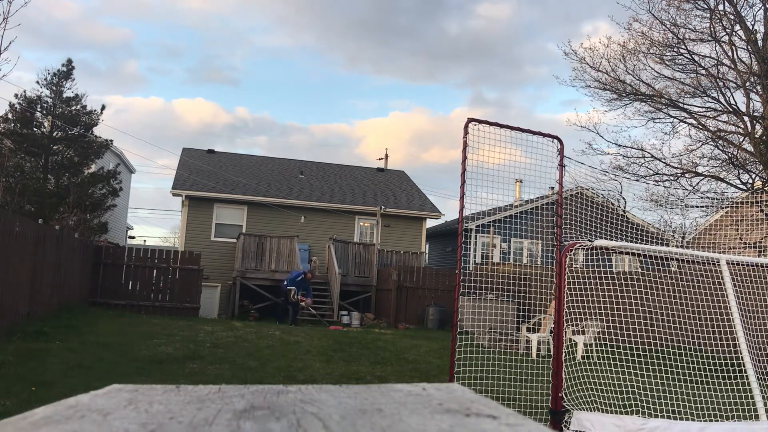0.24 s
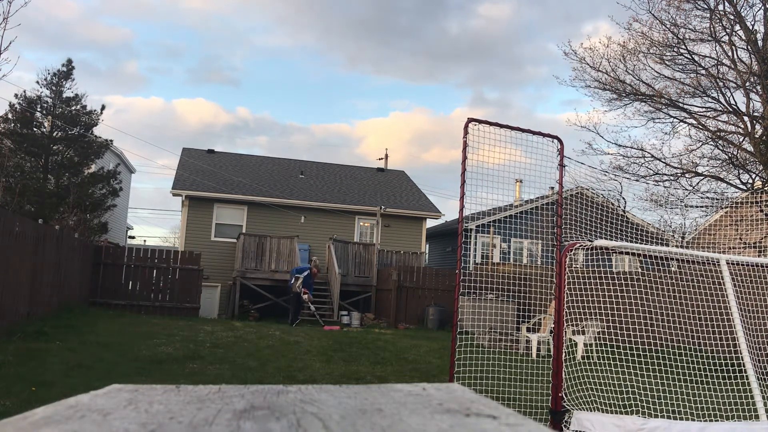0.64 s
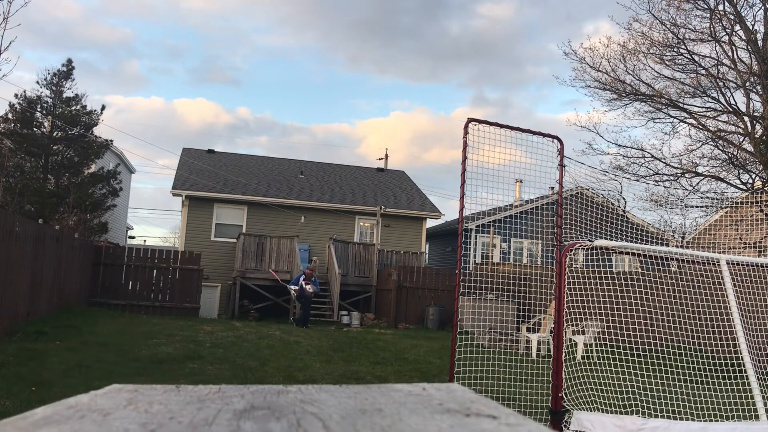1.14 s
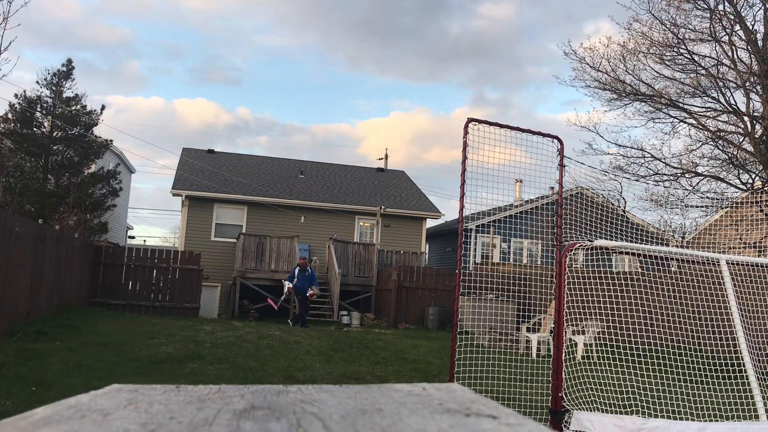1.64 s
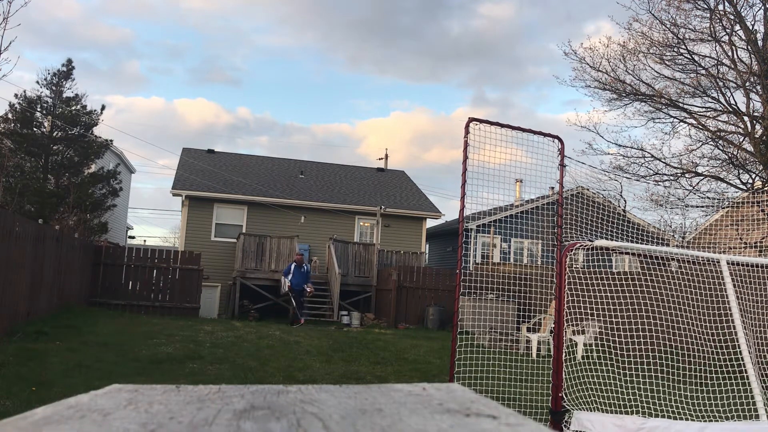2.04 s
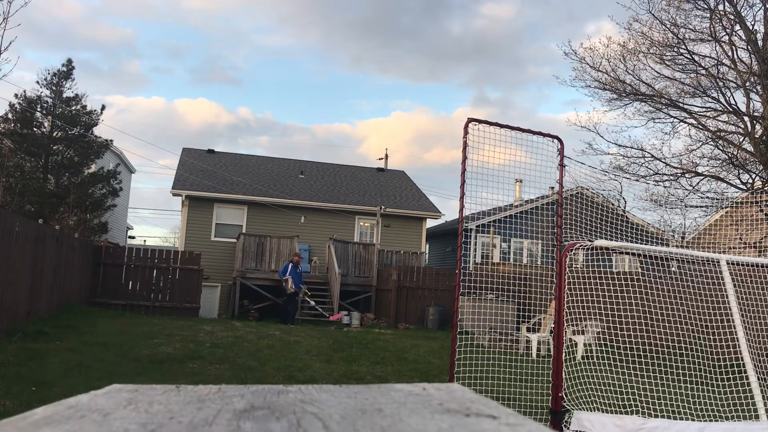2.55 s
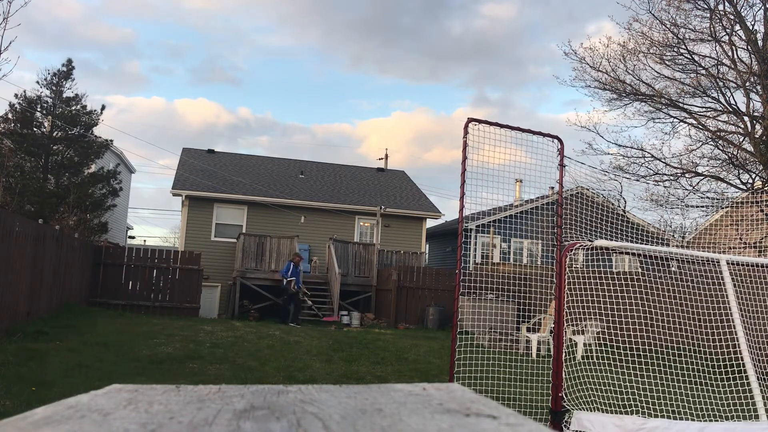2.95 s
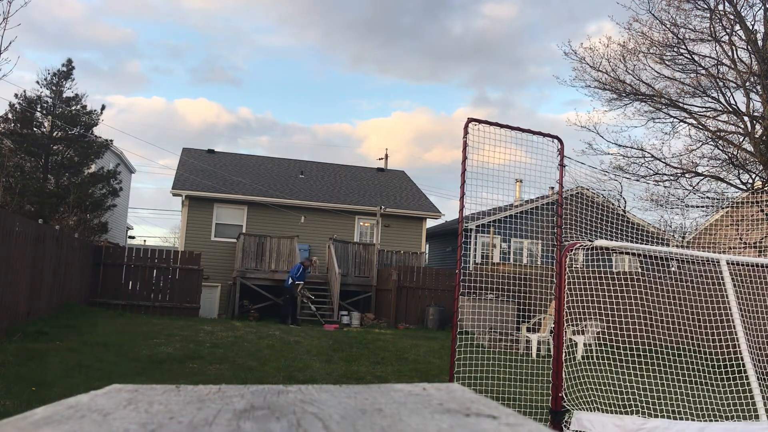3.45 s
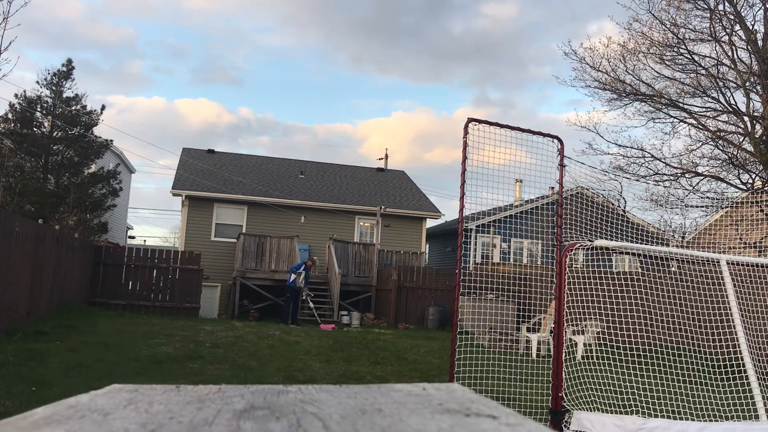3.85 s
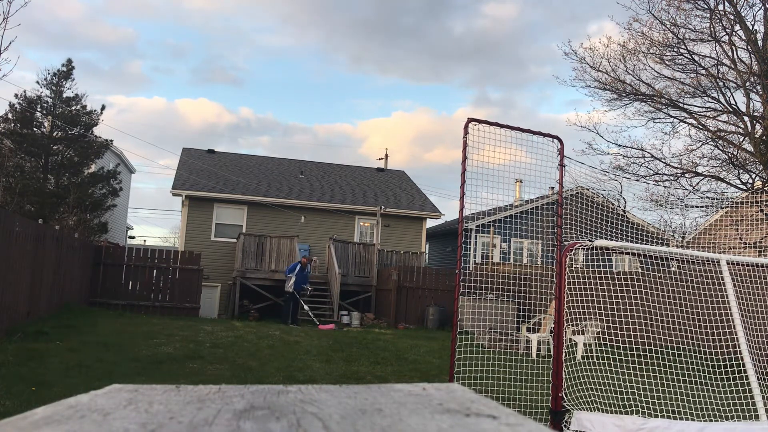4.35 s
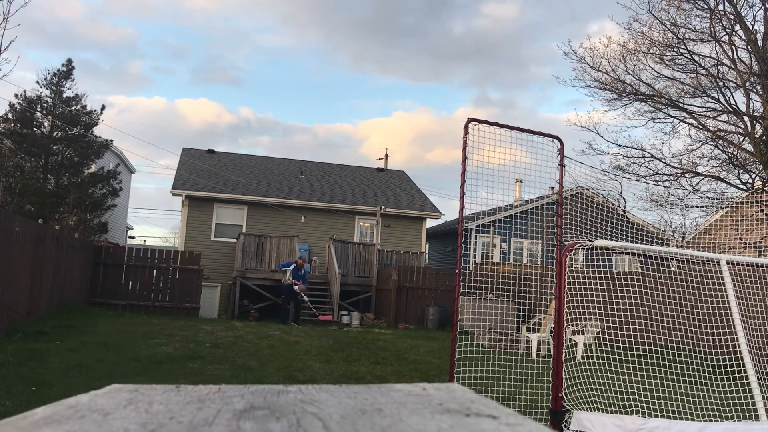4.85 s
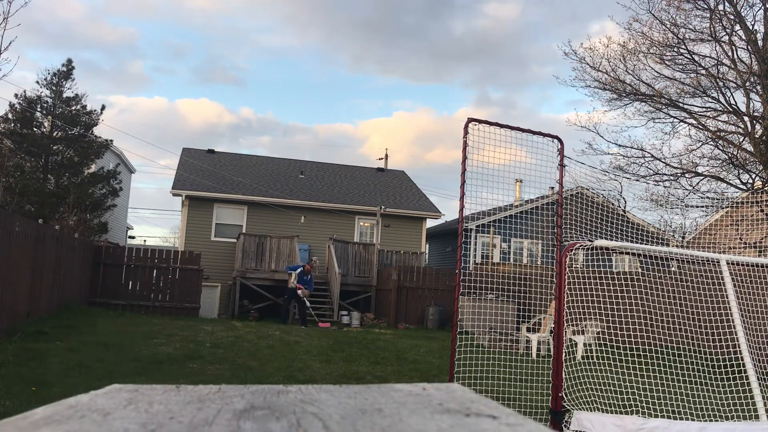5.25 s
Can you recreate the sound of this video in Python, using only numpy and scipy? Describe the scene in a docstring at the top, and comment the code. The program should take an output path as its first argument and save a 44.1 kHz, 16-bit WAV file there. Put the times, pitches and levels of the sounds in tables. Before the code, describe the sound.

Outdoor puck handling: far-off stick clacks, one sharp crashing hit in the close net and metal frame, then more scattered taps over low hum.

```python
"""A distant engine hums throughout while a player handles a puck on a board at the far end of a fenced backyard.
The player sweeps the puck along and shoots: filtered noise scrapes, and bounces excite board and blade resonances.
In the goal close by, netting whips, the target thuds and rattles (resonances), and the steel frame rings (sines).
The player then pulls up the next puck and handles it; a last hard landing comes near the end.
Echoes and a scattered tail follow the sounds of player and goal, and faint ticks come now and then."""
import sys
import numpy as np
from scipy import signal
from scipy.fft import rfft, irfft, next_fast_len
from scipy.io import wavfile
from scipy.ndimage import map_coordinates

SR = 44100
rng = np.random.default_rng(int(sys.argv[2]) if len(sys.argv) > 2 else 0)


def pcm_store(signal):
    """Save signal as 16-bit PCM."""
    levels = np.round(np.clip(np.atleast_2d(signal), -1, 1) * 32767)
    wavfile.write(sys.argv[1], SR, levels.astype(np.int16).T)


N = 242991
TIME = np.arange(N) / SR  # s
BLOW_SIZE = 8192  # samples in one short blow


def from_db(db):
    """Turn decibels into a gain."""
    return 10 ** (np.asarray(db) / 20)


def rms_one(x):
    """Scale a sound to rms 1."""
    return x / np.sqrt(np.mean(x ** 2) + 1e-30)


def at_hz(points, hz):
    """Read a table between its points, on a log-frequency axis."""
    points = np.array(points)
    return np.interp(np.log(np.maximum(hz, 1)), np.log(points[:, 0]), points[:, 1])


def cut(x, hz, kind, order=2):
    """Keep only part of the spectrum, with a Butterworth filter."""
    edge = np.minimum(hz, SR / 2 - 100)
    return signal.sosfilt(signal.butter(order, edge, kind, fs=SR, output="sos"), x)


def coloured(x, spectrum):
    """Weight each frequency of x by a smooth curve."""
    gain = from_db(at_hz(spectrum, np.fft.rfftfreq(len(x), 1 / SR)))
    return irfft(rfft(x) * gain, len(x))


def noise(spectrum):
    """Make steady noise of one colour, with rms 1."""
    white = rng.standard_normal(next_fast_len(N))
    return rms_one(coloured(white, spectrum)[:N])


def drift(rate):
    """Wander smoothly by about 1 either way, through rate random points a second."""
    knots = rng.standard_normal(1024)
    return map_coordinates(knots, [TIME * rate], mode="mirror")


def resonate(x, modes):
    """Let x drive side-by-side resonances, added with alternating signs."""
    out = 0
    for k, (hz, width, db) in enumerate(modes):
        r = np.exp(-np.pi * width / SR)  # a wider resonance dies faster
        poles = [1, -2 * r * np.cos(2 * np.pi * hz / SR), r * r]
        gain = (-1) ** k * from_db(db) * (1 - r * r) / 2
        out = out + gain * signal.lfilter([1, 0, -1], poles, x + 1e-18)
    return out


def add(track, s, sound, db):
    """Lay a short sound into the track, with the energy that db rms has in 10 ms."""
    start = int(s * SR)
    energy = np.sum(sound ** 2) / (SR / 100)
    track[start:start + len(sound)] += (from_db(db) * sound / np.sqrt(energy))[:N - start]


def clatter(decay, first_share, grain_db):
    """Force of one contact: a first sharp touch, then uneven micro-slaps that die away."""
    slaps = rng.standard_normal(BLOW_SIZE) * from_db(grain_db * rng.standard_normal(BLOW_SIZE))
    force = slaps * np.exp(-np.minimum(TIME[:BLOW_SIZE] / decay, 20))
    force[0] = first_share * np.sqrt(np.sum(force ** 2))
    return force


# sine tones of the engine: (multiple of the firing rate, peak level before wavering [dB])
ENGINE_TONES = [(1, -63.5), (2, -48.5)]
# colour of the low rumble: (frequency [Hz], relative level [dB])
RUMBLE_COLOUR = [(20, -35), (31, -5.5), (52, -3), (63, 1), (73, -0.5), (84, -6.5), (100, -11.5), (130, -24),
                 (200, -48.5)]
# colour of the still outdoor air: (frequency [Hz], relative level [dB])
AIR_COLOUR = [(60, -19), (95, -10), (125, -8.5), (200, -22.5), (300, -25), (650, -27.5), (1000, -32.5),
              (1500, -39.5), (2500, -42.5), (5000, -47.5), (10000, -57), (15800, -54.5)]


def background(waver_db, rumble_db, air_db):
    """An engine idles far off, its pitch and level wavering, over low rumble and still outdoor air."""
    firing_hz = 36.24 * (1 + 0.0037 * drift(3.23))
    turns = np.cumsum(firing_hz) / SR
    hum = sum(from_db(db) * np.sin(2 * np.pi * multiple * turns) for multiple, db in ENGINE_TONES)
    engine = hum * from_db(waver_db * drift(12))
    rumble = from_db(rumble_db) * noise(RUMBLE_COLOUR)
    air = from_db(air_db) * noise(AIR_COLOUR)
    return engine + rumble + air


# echoes from house and fence: (delay [s], level before the shift walls_db [dB])
WALL_ECHOES = [(0.025, -15.5), (0.048, -15), (.073, -20.5), (0.12, -24.5)]
# colour of the scattered tail: (frequency [Hz], level before the shift tail_db [dB])
TAIL_COLOUR = [(100, 2.5), (280, -11.5), (700, -4.5), (2500, -1.5), (5000, -10.5), (8000, -5), (15000, 0)]
# tail of the far player: (frequency [Hz], time to fall by 60 dB [s])
FAR_TAIL = [(100, 0.97), (280, 0.78), (700, 0.97), (2500, 0.98), (5000, 0.74), (8000, 0.38), (15000, 0.22)]
# tail of the near goal: (frequency [Hz], time to fall by 60 dB [s])
NEAR_TAIL = [(100, 0.4), (280, 0.48), (700, 0.52), (2500, 0.69), (5000, 0.62), (8000, 0.61), (15000, 0.13)]


def yard(x, t60s, tail_db, walls_db, build_s):
    """House and fence give a few dull echoes, then scatter builds up and dies band by band."""
    t, scatter = TIME[:SR], np.zeros(SR)
    edges = np.geomspace(70, 17000, 13)  # Hz
    for low, high in zip(edges, edges[1:]):
        hz = np.sqrt(low * high)
        build_up = 1 - np.exp(-t / build_s)
        fade = np.exp(-np.log(1000) * t / at_hz(t60s, hz)) * build_up
        band = cut(rng.standard_normal(SR), [low, high], "band")
        level = from_db(tail_db + at_hz(TAIL_COLOUR, hz))
        scatter += level * band * fade / np.sqrt(np.sum(fade ** 2))
    echoes = np.zeros(SR)
    for delay, db in WALL_ECHOES:
        echoes[int(delay * SR)] = from_db(db + walls_db)
    return signal.fftconvolve(x, scatter + cut(echoes, 5000, "low"))[:N]


def deck(x, scatter_db, decay_s):
    """Steps and railings just behind the player throw back a quick spray of reflections."""
    t = TIME[:BLOW_SIZE]
    hits = rng.random(BLOW_SIZE) < .05  # one sample in twenty carries a reflection
    spray = rng.standard_normal(BLOW_SIZE) * hits * t * np.exp(-t / decay_s)
    spray = cut(spray / np.sqrt(np.sum(spray ** 2)), 530, "high")
    return from_db(scatter_db) * signal.fftconvolve(x, spray)[:N]


def ticks():
    """Faint ticks come at uneven moments: rows of (time [s], level [dB], decay [s])."""
    rate, middle_db, spread_db, decay_s = 0.88, -73.5, 2.0, .001  # rate in ticks per second
    chance = rng.random((32, 2))
    times = np.cumsum(.5 + chance[:, 0]) / rate
    levels = middle_db + spread_db * (2 * chance[:, 1] - 1)
    return [(s, db, decay_s) for s, db in zip(times, levels) if s < TIME[-1]]


def grainy_bursts(events, spectrum, first_share):
    """Each burst is a run of fine, uneven grains that dies away, given one colour."""
    out = np.zeros(N)
    for s, db, decay in events:
        # a tiny delay leaves room for the colouring to spread ahead of the first grain
        grains = np.roll(clatter(decay, first_share, grain_db=10.0), 20)
        add(out, s, coloured(grains, spectrum), db)
    return out


# bright rustles close by: (time [s], level [dB], decay [s])
RUSTLE_BURSTS = [(.8635, -59, 0.012), (.885, -68, .04)]
# colour of rustles and ticks: (frequency [Hz], relative level [dB])
TICK_COLOUR = [(1000, -8), (4000, -2), (8000, -2), (15700, -3)]


def rustles_and_ticks():
    """Bright rustles close by and faint ticks, both made of fine grains."""
    return grainy_bursts(RUSTLE_BURSTS + ticks(), TICK_COLOUR, first_share=0.21)


# light skids: (time of the peak [s], half length [s], hiss level [dB], squeal level [dB])
SKID_SWELLS = [(0.623, 0.025, -83, -71), (2.458, 0.1, -73.5, -88), (5.237, .1, -79, -71)]
# hiss resonances: (frequency [Hz], width [Hz], relative level [dB])
HISS_MODES = [(2500, 1100, 3), (3460, 2100, 0)]
# squeal resonances: (frequency [Hz], width [Hz], relative level [dB])
SQUEAL_MODES = [(1030, 83, 2), (1380, 79, -1.5), (1585, 53, -4), (2870, 170, -10.5), (3320, 140, -9)]


def skids(waver_db):
    """Under little weight the blade hisses or faintly squeals, in smooth swells."""
    hiss = rms_one(resonate(rng.standard_normal(N), HISS_MODES))
    squeal = resonate(rng.standard_normal(N), SQUEAL_MODES)
    squeal = rms_one(squeal * from_db(waver_db * drift(40)))
    out = np.zeros(N)
    for s, half, hiss_db, squeal_db in SKID_SWELLS:
        swell = from_db(-8 * ((TIME - s) / half) ** 2)  # 8 dB down half a length from the peak
        out += swell * (hiss * from_db(hiss_db) + squeal * from_db(squeal_db))
    return out


# drags of the puck: (time of the peak [s], peak level [dB], rise [dB/s], fall [dB/s])
DRAG_STROKES = [(.93, -58.5, 71, 84), (4.775, -63.5, 190, 134)]
# colour of the scrape: (frequency [Hz], relative level [dB])
SCRAPE_COLOUR = [(120, -10), (280, 16), (500, 1.5), (1100, 2), (1550, 3.5), (2100, -1), (3200, -2),
                 (5000, -5), (8000, -11.5), (15000, -24)]


def scrapes(rough_db):
    """The blade drags the puck over the gritty board: rough noise that swells and fades."""
    level = np.zeros(N)
    for s, db, rise, fall in DRAG_STROKES:
        drop_db = np.maximum(rise * (s - TIME), fall * (TIME - s))
        level += from_db(db - drop_db)
    grit = rms_one(noise(SCRAPE_COLOUR) * from_db(rough_db * drift(170)))
    return level * grit


# netting jerked taut: (time [s], level [dB], decay [s])
NET_JERKS = [(1.8275, -53, 0.0013), (1.8295, -45.5, 0.026), (1.8965, -38, 0.015), (1.96, -59, .035)]
# colour of the netting: (frequency [Hz], relative level [dB])
NET_COLOUR = [(500, 1), (1500, -8), (3800, 3.5), (5200, 1.5), (7000, 0.5), (10500, -1.5), (13000, -4.5),
              (15700, -0.5)]


def net_whips():
    """Netting jerked taut whips in short bursts of fine grains."""
    return grainy_bursts(NET_JERKS, NET_COLOUR, first_share=0.11)


# blows that reach the steel frame: (time [s], level [dB])
STEEL_BLOWS = [(1.826, -69), (1.8772, -62), (1.897, -51)]
# ringing tones of the steel: (frequency [Hz], relative level [dB], time to fall by 60 dB [s])
STEEL_MODES = [(281.5, 3.5, 0.43), (498, -3, 0.42), (584, -0.5, .45), (657, -11, 0.19), (692, 0, 0.16),
               (850, -10, 0.18), (2350, -5.5, 0.42), (2510, -9, 0.42), (2750, -2, 0.18), (3350, -9, .2),
               (3946, 0, 0.17), (5810, -7.5, 0.55), (6481, -10, 0.5), (6610, -3, 0.59), (6630, -7, 0.48),
               (6780, -4, 0.54), (7887, -9, .12), (8800, -4, .12), (9300, -8, .24), (10600, -5, 0.1)]


def frame(buzz_db):
    """The steel tubes ring on, buzzing against the net; each blow excites the modes a little differently."""
    out, t = np.zeros(N), TIME[:SR]
    for hz, db, t60 in STEEL_MODES:
        ringing = np.zeros(N)
        for s, blow_db in STEEL_BLOWS:
            start = int(s * SR)
            strength_db = blow_db + db + rng.normal(0, 1.0)
            ringing[start:start + SR] += from_db(strength_db - 60 * t / t60) * np.sin(2 * np.pi * hz * t)
        out += ringing * from_db(buzz_db * drift(120))
    return out


# thump of the board: (frequency [Hz], width [Hz], relative level [dB])
THUMP_MODES = [(165.3, 35.5, -3.5), (209, 46, 0), (296.6, 63, -1.5), (439, 187, -14.5)]
# clack of the blade: (frequency [Hz], width [Hz], relative level before pitch focus [dB])
CLACK_MODES = [(653, 167, 6.5), (927, 237, 2.5), (1614, 500, -3), (2694, 1190, 0), (3390, 1460, -2)]
# crack at the blade's edge: (frequency [Hz], width [Hz], relative level [dB])
EDGE_MODES = [(3800, 2100, -2.5), (5040, 800, 9.5), (9600, 1400, -31)]


def tap(force, thump_db, clack_db, crack_db, centre_hz, focus_db):
    """A contact thumps the board, clacks the blade and cracks its edge, the top dulled: (sound, dB) pairs."""
    # the spot of contact favours the blade resonances near one pitch
    blade = [(hz, width, db - focus_db * np.log2(hz / centre_hz) ** 2) for hz, width, db in CLACK_MODES]
    thump = cut(resonate(force, THUMP_MODES), 770, "low")
    clack = cut(resonate(force, blade), 4100, "low")
    crack = cut(resonate(force, EDGE_MODES), 9600, "low")
    return [(thump, thump_db), (clack, clack_db), (crack, crack_db)]


# blade landings, levels of the first contact: (time [s], thump level [dB], clack level [dB],
# crack level [dB], clack centre [Hz], bounce gap [s], loss per bounce [dB])
LANDINGS = [(0.185, -38.5, -49, -56.5, 1770, .021, 1.55), (0.307, -65, -59.5, -79, 1808, .01, 9),
            (0.416, -45, -57, -67, 1740, .022, 1.5), (0.826, -54.5, -74, -84, 1260, .014, 8),
            (0.857, -47, -62, -76, 1400, .021, .5), (0.9809, -47.5, -50.5, -78, 1640, .016, 5),
            (3.2853, -38.5, -45, -48, 1700, .0125, 7), (3.455, -54, -63, -86, 1340, .014, 21),
            (3.555, -48.5, -70.5, -92, 1200, .016, 6), (3.5866, -52, -57, -88, 2130, .016, 16),
            (3.779, -47, -54.5, -71.5, 1317, .014, 6), (3.881, -50.5, -67, -76, 930, .013, 16),
            (3.9341, -46, -60, -70, 930, .016, 9), (3.989, -53, -67.5, -75, 940, .024, 12),
            (4.19, -47, -67, -83, 1060, .026, 6), (4.706, -56, -61, -83, 1240, .022, 4.5),
            (5.419, -41.5, -52.5, -50, 1800, .015, 0.5)]
# the toe of the blade slaps down flat after a hard landing: (time [s], crack level [dB])
TOE_LANDINGS = [(3.2986, -42), (5.4335, -50.5)]


def stick(focus_db):
    """Each landing is a short run of ever weaker, evenly spaced bounces; some hard ones add a toe slap."""
    out = np.zeros(N)
    for s, thump_db, clack_db, crack_db, centre_hz, gap, loss_db in LANDINGS:
        for k in range(4):
            force = clatter(0.52 * gap, first_share=0.6, grain_db=4.5)
            bounce_thump_db = thump_db - k * 3.0  # the thump dies faster than the clack
            for sound, db in tap(force, bounce_thump_db, clack_db, crack_db, centre_hz, focus_db):
                add(out, s + k * gap, sound, db - k * loss_db)
    for s, crack_db in TOE_LANDINGS:
        force = clatter(0.0011, first_share=0.3, grain_db=1.0)
        for sound, db in tap(force, crack_db - 6, crack_db - 5, crack_db, 1050, focus_db):
            add(out, s, sound, db)
    return out


# thud of the target: (frequency [Hz], width [Hz], relative level [dB])
THUD_MODES = [(86.5, 30, 5.5), (208, 43, 2), (272, 53, -3), (418, 110, -4)]
# knock of the target: (frequency [Hz], width [Hz], relative level [dB])
KNOCK_MODES = [(642, 115, 2.5), (837, 80, 3.5), (1020, 113, 1), (1560, 1300, -16.5)]
# crack of the target: (frequency [Hz], width [Hz], relative level [dB])
CRACK_MODES = [(2760, 580, 0), (3400, 280, 4), (3840, 770, -1), (5950, 610, -4.5), (6800, 1000, -6)]


def target(force, thud_db, knock_db, crack_db, top_hz):
    """A blow thuds, knocks and cracks, the brighter the harder the contact: (sound, dB) pairs."""
    thud = cut(resonate(force, THUD_MODES), 640, "low")
    knock = cut(cut(resonate(force, KNOCK_MODES), 2700, "low"), 410, "high")
    crack = cut(cut(resonate(force, CRACK_MODES), 1700, "high"), top_hz, "low")
    return [(thud, thud_db), (knock, knock_db), (crack, crack_db)]


# puck in the goal: (time [s], thud level [dB], knock level [dB], crack level [dB],
# clatter decay [s], top of the crack, higher for a harder contact [Hz])
PUCK_HITS = [(1.849, -48.5, -43.5, -49, 0.012, 4500), (1.861, -50.5, -45.5, -45, 0.004, 4200),
             (1.8666, -37.5, -45.5, -38.5, 0.005, 3900), (1.877, -36.5, -36.5, -37, 0.0019, 11000),
             (1.89, -51, -52, -47, 0.0036, 11000), (1.949, -51, -54, -48.5, 0.0012, 4000),
             (1.9744, -50.5, -64, -49.8, 0.0016, 5500), (1.9987, -43, -51, -62, 0.00094, 3000),
             (2.012, -42.5, -76, -61, 0.008, 4000)]


def goal():
    """The puck drives into the target, which slaps and rattles, then drops to the ground."""
    out = np.zeros(N)
    for s, thud_db, knock_db, crack_db, decay, top_hz in PUCK_HITS:
        force = clatter(decay, first_share=0.72, grain_db=6.0)
        for sound, db in target(force, thud_db, knock_db, crack_db, top_hz):
            add(out, s, sound, db)
    # the rattle is a thin scatter of touches, about 800 a second
    touches = rng.random(BLOW_SIZE) < 800 / SR
    rattle = clatter(0.045, first_share=0, grain_db=2.5) * touches
    for sound, db in target(rattle, thud_db=-44, knock_db=-44, crack_db=-45.5, top_hz=9000):
        add(out, 1.897, sound, db)
    return out


def scene():
    """The far player is heard with much of the yard, the near goal with little."""
    far = stick(focus_db=4.5) + scrapes(rough_db=2.0) + skids(waver_db=4.0)
    near = goal() + frame(buzz_db=3.5) + net_whips() + rustles_and_ticks()
    far_deck = deck(far, scatter_db=-7.0, decay_s=0.011)
    far_yard = yard(far, FAR_TAIL, tail_db=-4.0, walls_db=-0.5, build_s=0.019)
    near_yard = yard(near, NEAR_TAIL, tail_db=-6.5, walls_db=-1.5, build_s=0.011)
    behind = background(waver_db=1.07, rumble_db=-58.5, air_db=-58.5)
    return (far + far_deck + far_yard + near + near_yard + behind)[None]


def record(dry):
    """Cut the top steeply above 15.9 kHz."""
    return signal.sosfilt(signal.ellip(12, .1, 70, 15900, fs=SR, output="sos"), dry)


dry = scene()
out = record(dry)
pcm_store(out)
```